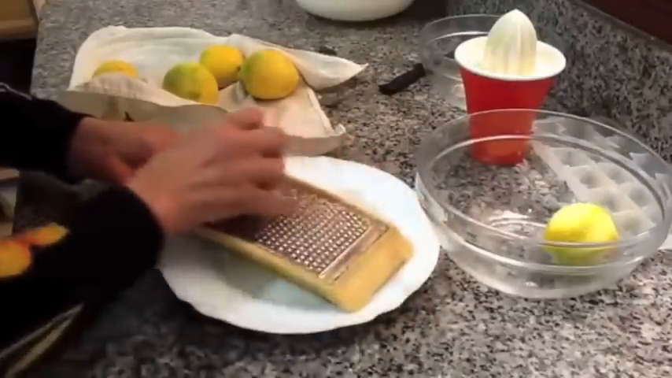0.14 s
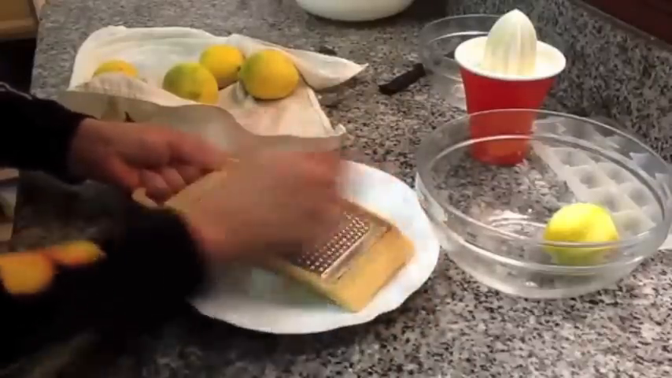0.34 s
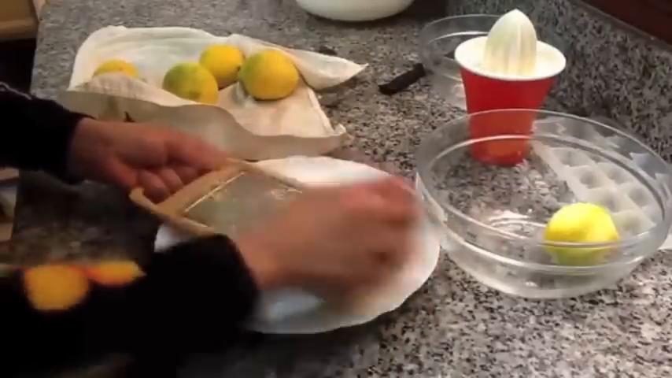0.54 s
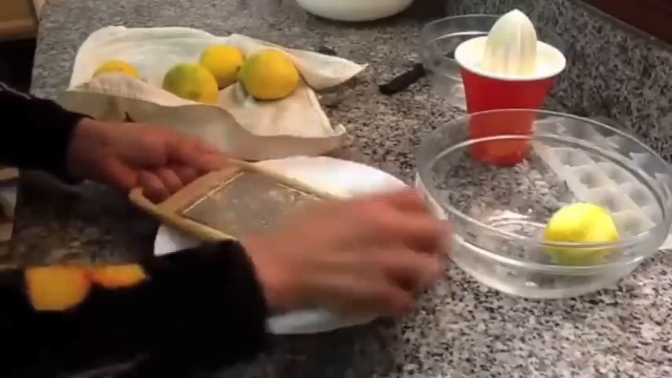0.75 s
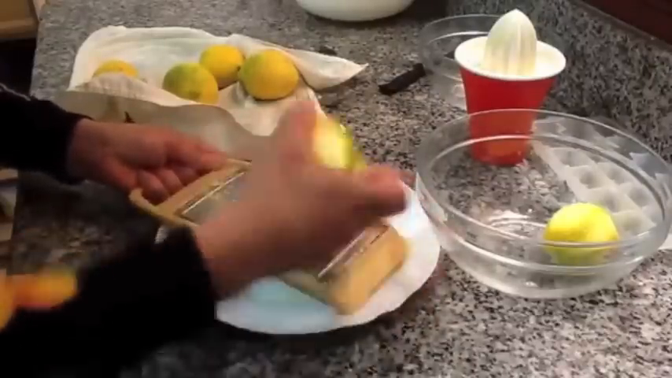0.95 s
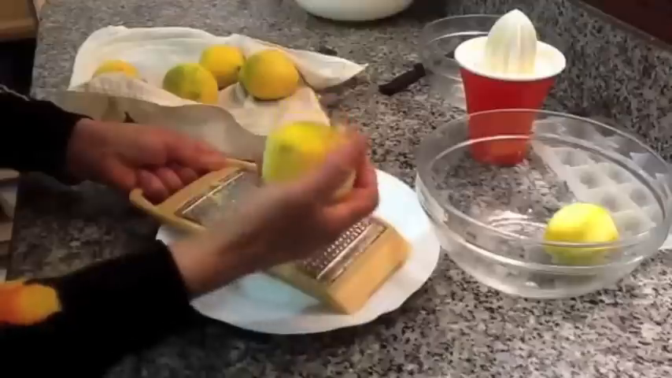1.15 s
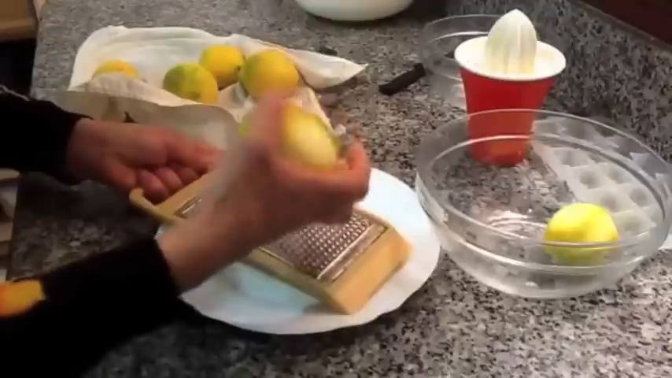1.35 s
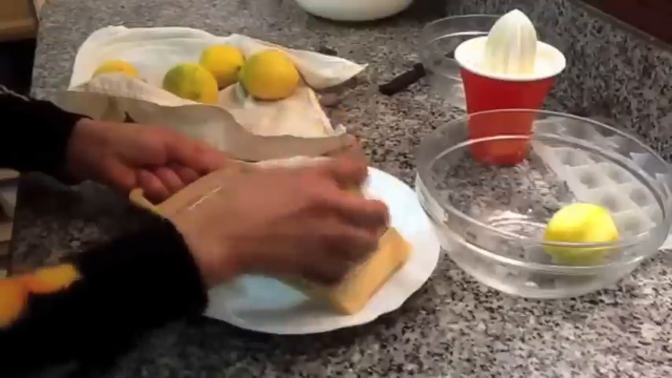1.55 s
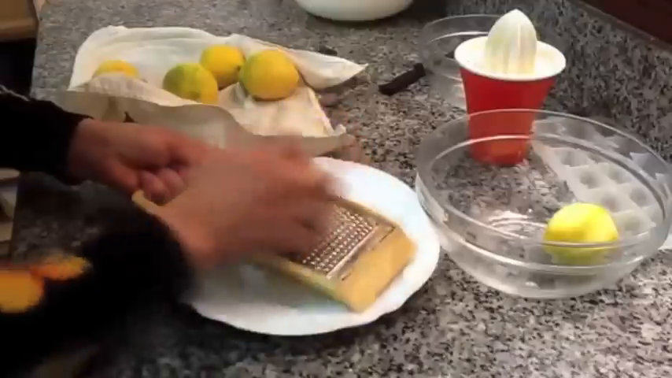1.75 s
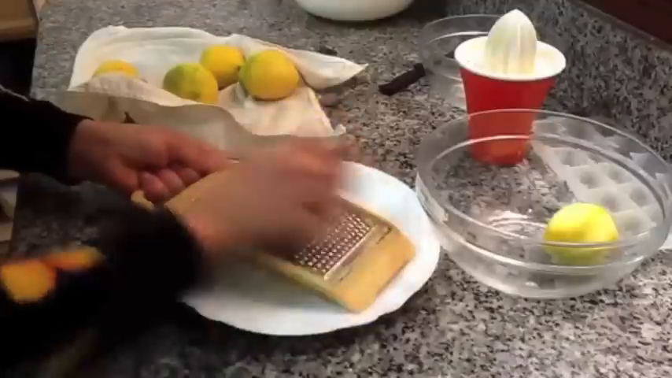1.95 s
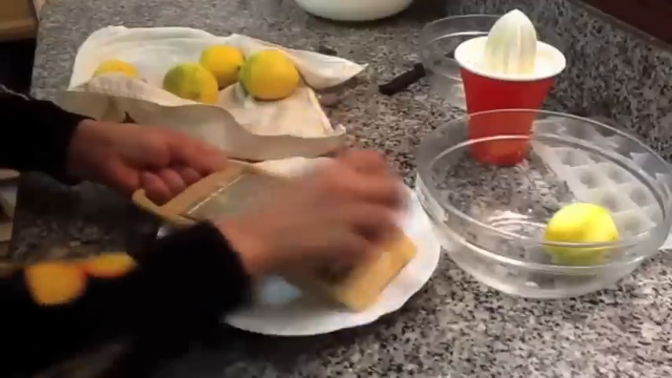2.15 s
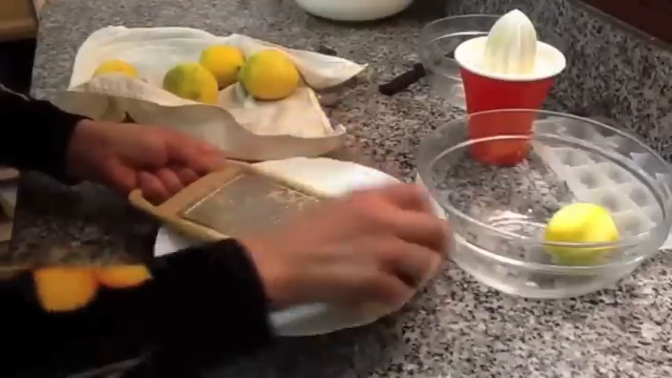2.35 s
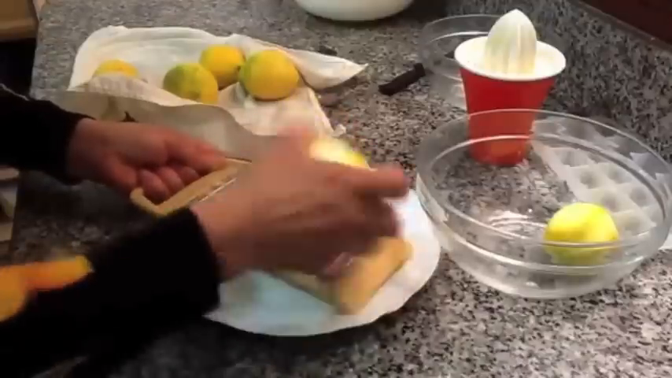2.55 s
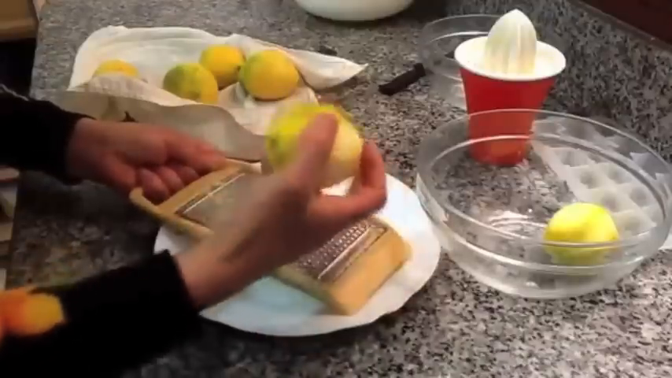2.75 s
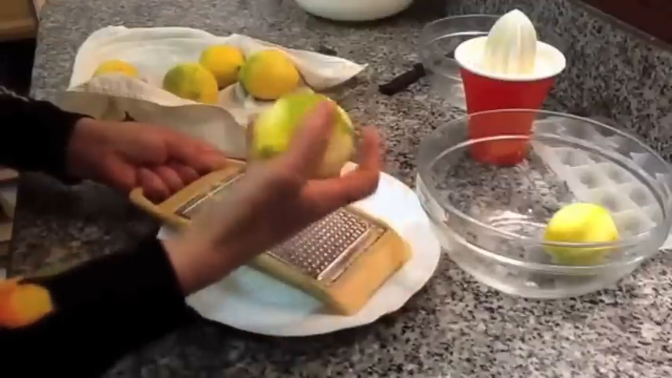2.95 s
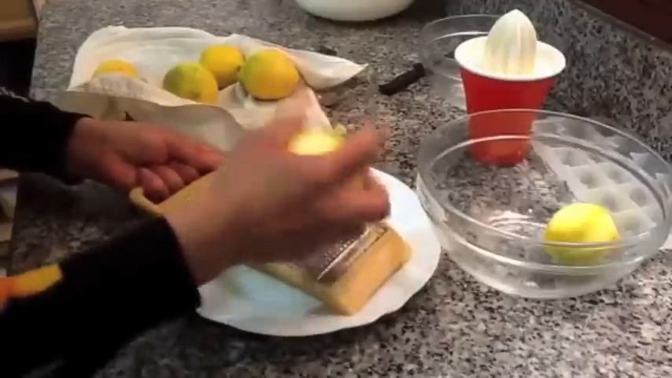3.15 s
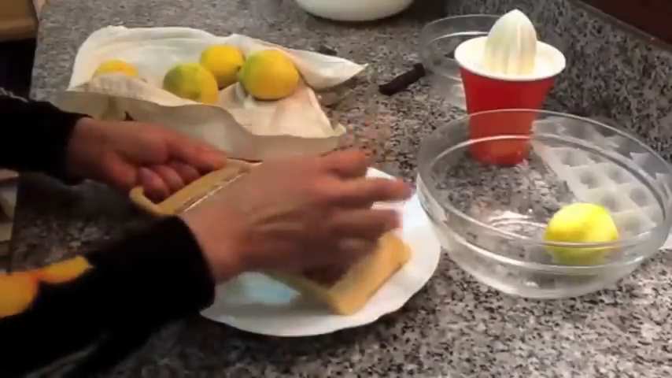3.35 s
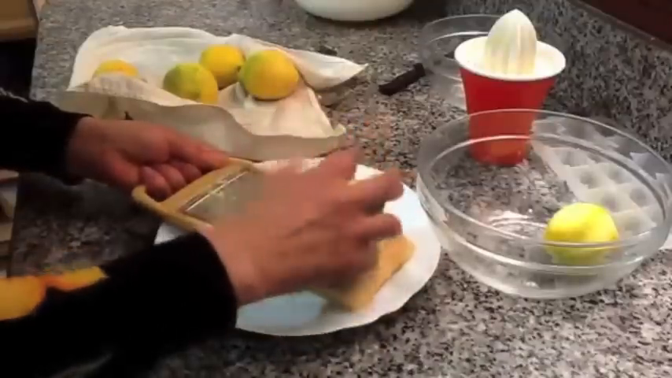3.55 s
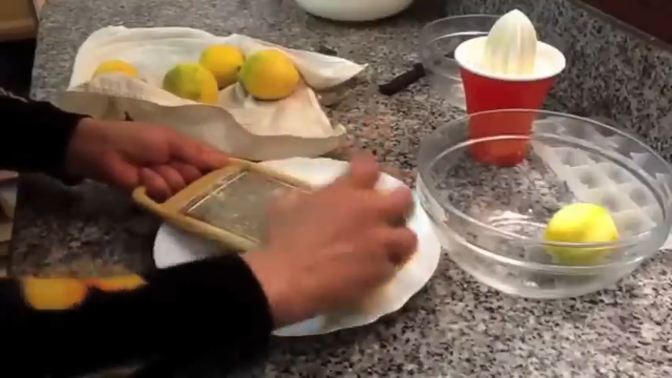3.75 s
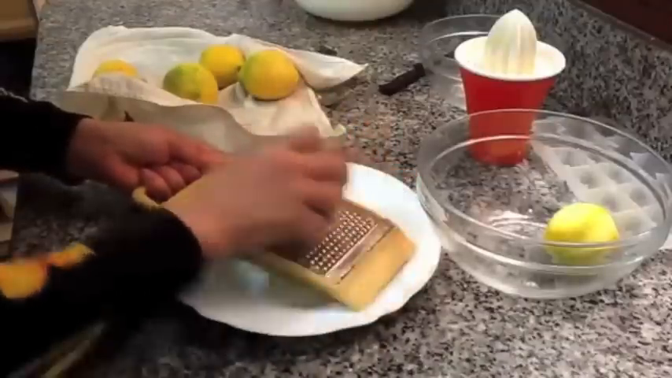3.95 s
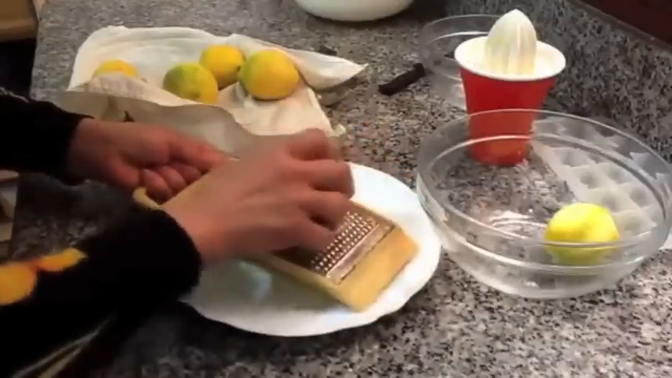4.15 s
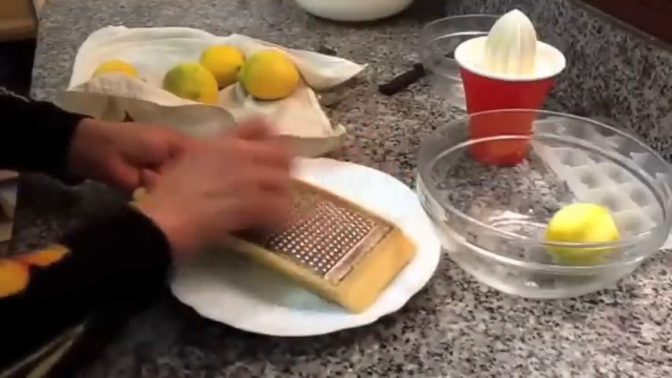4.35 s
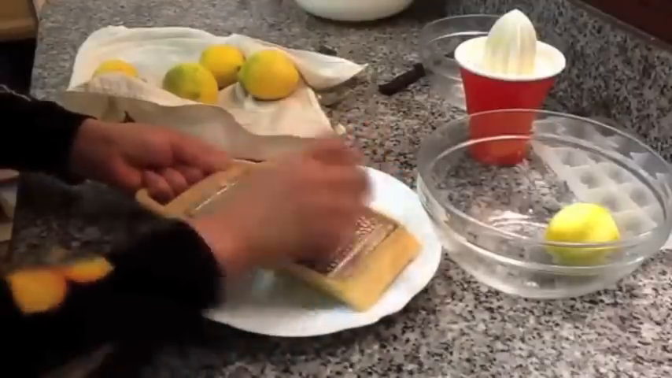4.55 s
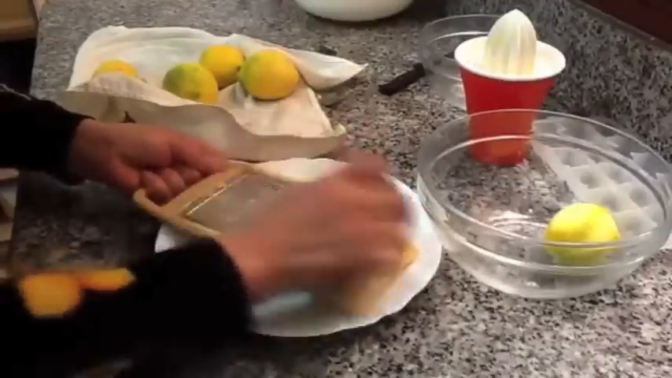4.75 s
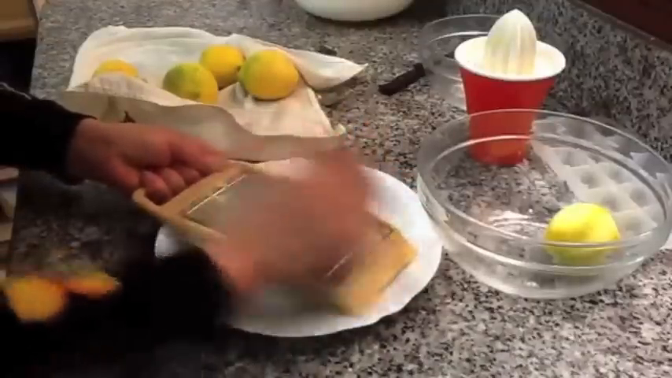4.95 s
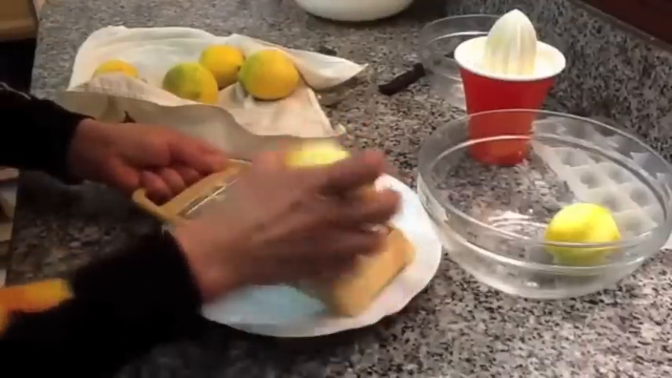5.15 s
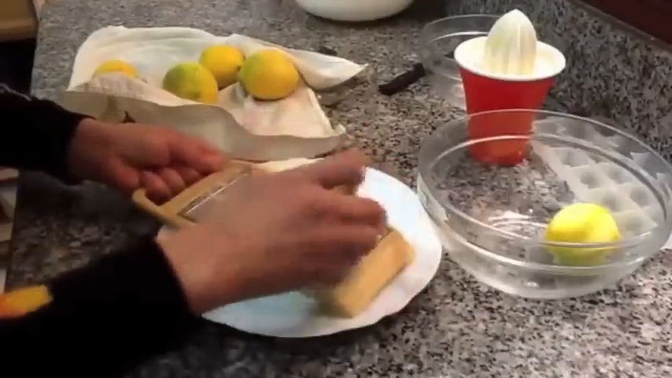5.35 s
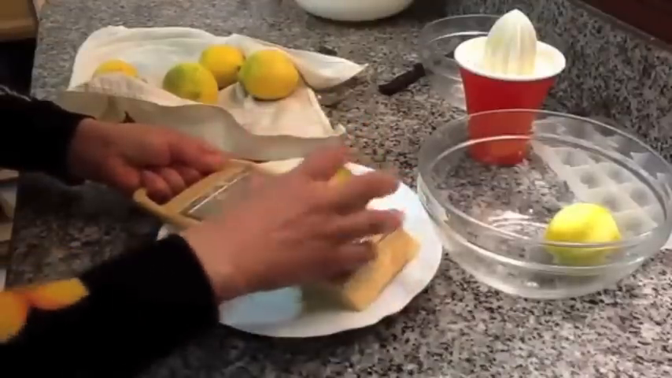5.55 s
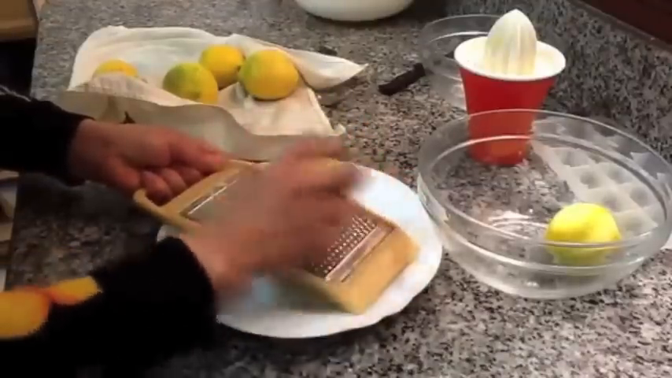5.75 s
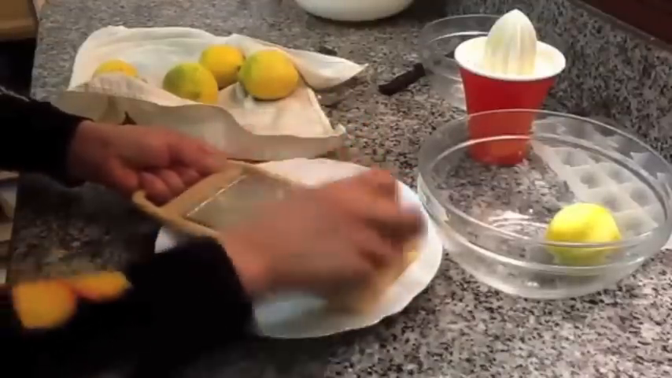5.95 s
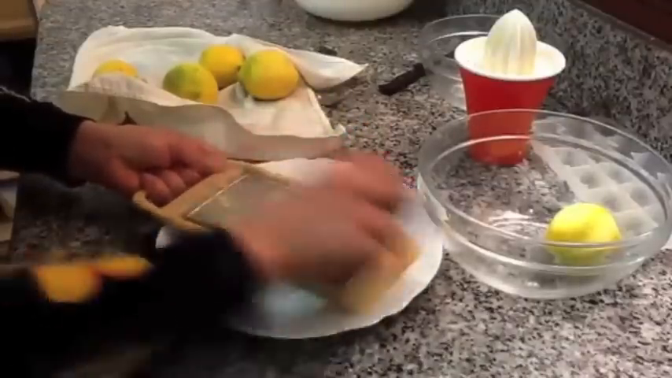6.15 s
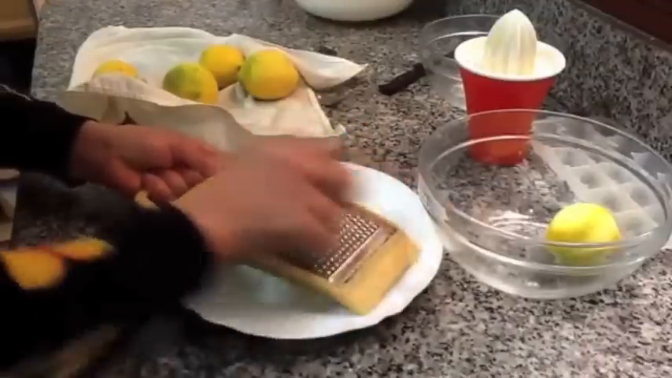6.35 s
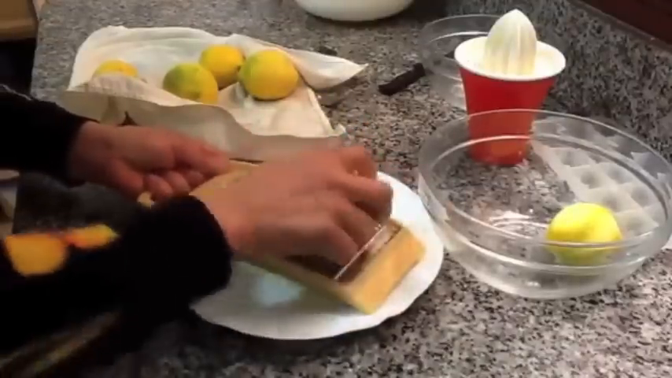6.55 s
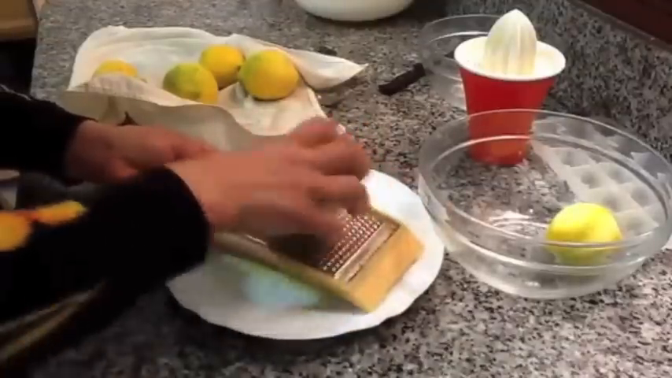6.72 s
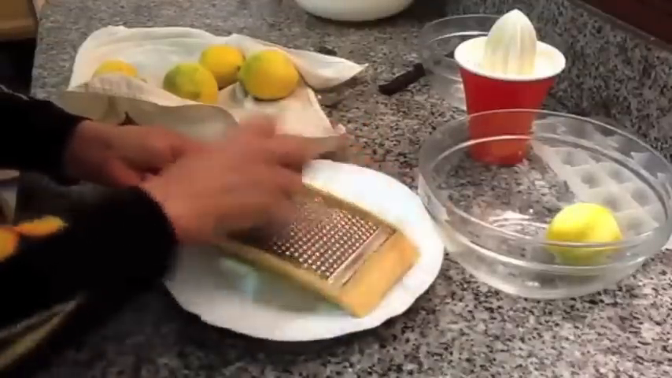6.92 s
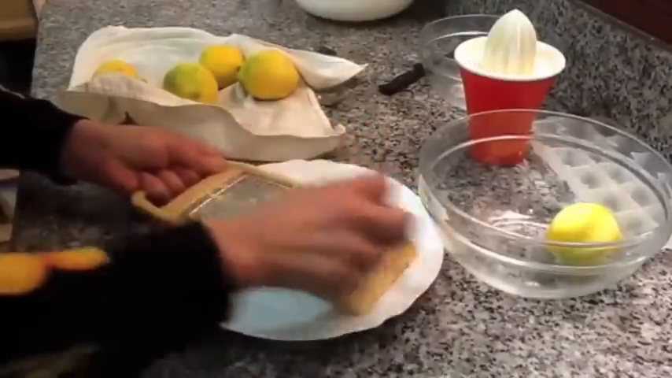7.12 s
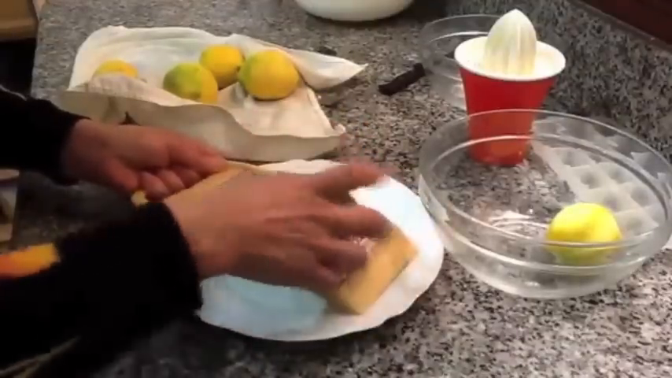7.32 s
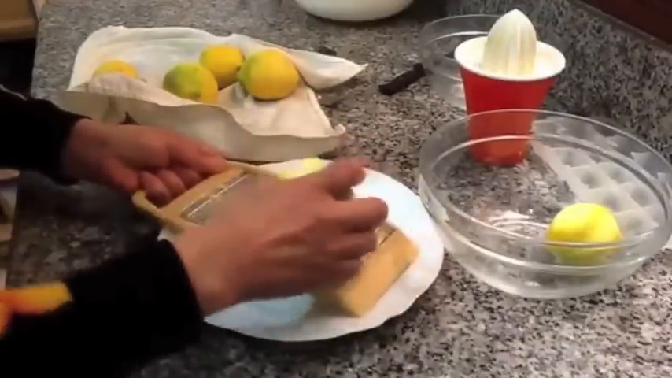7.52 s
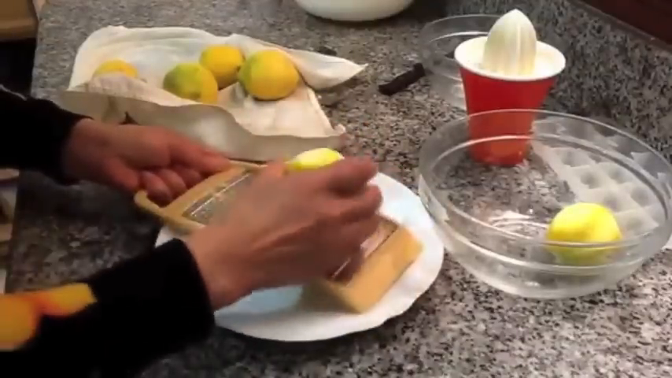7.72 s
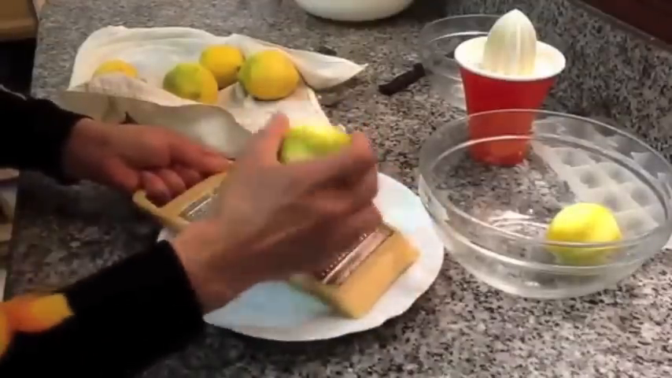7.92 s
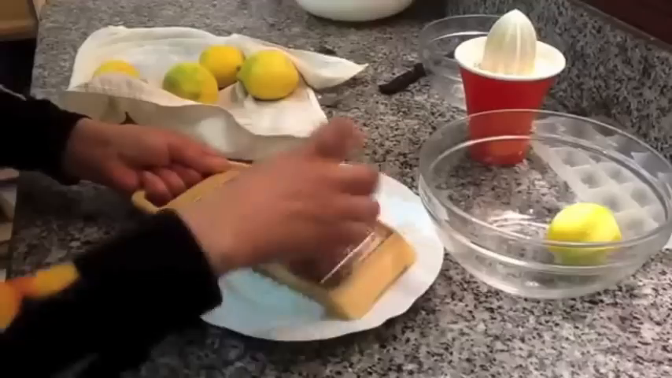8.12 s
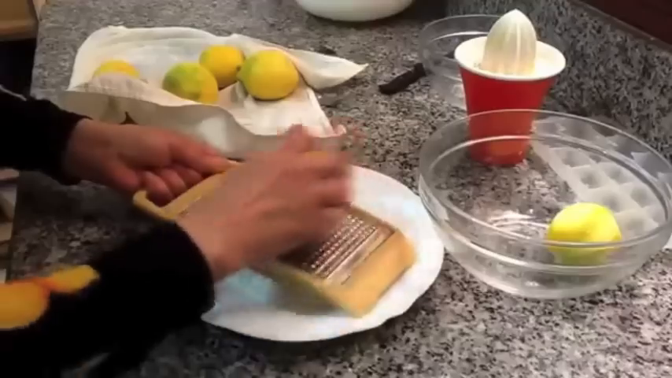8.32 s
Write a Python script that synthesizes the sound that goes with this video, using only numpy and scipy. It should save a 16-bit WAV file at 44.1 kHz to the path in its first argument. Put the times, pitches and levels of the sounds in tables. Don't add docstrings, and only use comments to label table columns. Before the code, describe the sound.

Close up in a hard tiled kitchen, a lemon is rasped over a flat steel grater in groups of fast strokes, gritty and fizzy, hard downstrokes with lighter returns. Between groups the plastic frame clacks on a china plate; the loudest clank, past five seconds, overloads the small mono microphone. Faint traffic and a distant engine lie beneath.

```python
import sys
import numpy as np
from scipy import signal
from scipy.fft import rfft, irfft, next_fast_len
from scipy.io import wavfile
from scipy.ndimage import uniform_filter1d, map_coordinates

SR = 44100
rng = np.random.default_rng(int(sys.argv[2]) if len(sys.argv) > 2 else 0)


def boost_factor(decibels):
    exponent = np.asarray(decibels, float) / 20
    return 10 ** exponent


def store_wav(level_fs):
    pcm = np.round(np.clip(np.atleast_2d(level_fs), -1, 1) * 32767)
    wavfile.write(sys.argv[1], SR, pcm.T.astype(np.int16))


N = 373968


def noise():
    return rng.standard_normal(N)


def unit(x):
    return x / np.sqrt(np.mean(np.abs(x) ** 2) + 1e-20)


def along(points, hz):
    f, v = np.transpose(points)
    return np.interp(np.log(hz + 1), np.log(f + 1), v)


def curves(rows):
    s, *cols = np.transpose(rows)
    return [np.interp(np.arange(N) / SR, s, c) for c in cols]


def wobble(rate_hz):
    knots = rng.standard_normal(int(N * rate_hz / SR) + 4)
    return map_coordinates(knots, [np.arange(N) * rate_hz / SR])


def filtered(x, response):
    m = next_fast_len(N + SR // 2)
    gain = unit(response(np.fft.rfftfreq(m, 1 / SR)))
    return irfft(rfft(x, m) * gain, m)[:N]


def colour(points):
    return lambda f: boost_factor(along(points, f))


def ring(x, peaks, shift_db, rate_hz):
    out = np.zeros(N)
    t = np.arange(N) * rate_hz / SR
    knots = int(t[-1]) + 2
    for k, (hz, width_hz, db) in enumerate(peaks):
        grip_db = shift_db * np.interp(t, np.arange(knots), rng.standard_normal(knots))
        b, a = signal.iirpeak(hz, hz / width_hz, SR)
        out += (-1) ** k * boost_factor(db) * signal.lfilter(b, a, x * boost_factor(grip_db))
    power = sum(boost_factor(2 * db) * np.pi * width_hz / SR for hz, width_hz, db in peaks)
    return out / np.sqrt(power)


# peak_s, level_db, rise_s, fall_s, frame_weight_db
DOWN_STROKES = [(0.273, -11, 0.058, 0.017, -0.5), (0.504, -10, 0.044, 0.039, 1.5),
                (0.739, -8.5, 0.034, 0.032, 1), (1.795, -14, 0.038, 0.1, -2.5),
                (2.084, -8.5, 0.031, 0.051, -2), (2.36, -8, 0.05, 0.013, -1),
                (4.497, -12, 0.052, 0.028, 1.5), (4.737, -10.5, 0.028, 0.059, -0.5),
                (4.996, -10.5, 0.044, 0.031, -0.5), (5.95, -13, 0.046, 0.019, -3.5),
                (6.169, -11.5, 0.037, 0.041, 0), (6.409, -15.5, 0.033, 0.019, -1),
                (7.048, -10, 0.041, 0.023, 3.5), (8.49, -15.5, 0.029, 0.03, 0)]
# peak_s, level_db, rise_s, fall_s, frame_weight_db
BACK_STROKES = [(0.0, -41.5, 0.012, 0.068, -1), (0.39, -18.5, 0.04, 0.037, -0.8),
                (0.628, -14.5, 0.034, 0.041, -1.7), (1.993, -17, 0.036, 0.015, -1.5),
                (2.235, -18, 0.063, 0.029, 0), (4.891, -22, 0.0306, 0.0251, 2), (5.11, -33, .03, 0.022, 9),
                (6.049, -19, 0.032, 0.049, 0.7), (6.281, -19.5, 0.042, 0.088, -0.5),
                (6.5, -41, 0.04, 0.08, -8), (6.927, -29, 0.029, 0.035, 2), (7.16, -27.5, 0.044, 0.032, -10),
                (8.383, -30, 0.035, 0.028, 1)]
# peak_s, level_db, rise_s, fall_s, frame_weight_db
RUBS = [
    (1.677, -28, 0.016, 0.055, -1.5),
    (1.843, -24, 0.02, 0.04, -3.5),
    (3.945, -37, 0.046, 0.032, -0.5),
    (4.362, -39, 0.034, 0.026, -1),
    (4.654, -32, 0.046, 0.036, -1.2),
    (5.844, -38, 0.06, .015, 2),
]
# peak_s, level_db
BITES = [
    (0.132, -40.5),
    (0.221, -24.5),
    (2.059, -28.5),
    (2.311, -20.5),
    (4.445, -36),
    (5.9, -38.5),
    (6.33, -30),
    (7.004, -21),
]


def hand():
    t = np.arange(N) / SR
    force = np.zeros((3, N))
    bites = [(s, db, 0.015, 0.011, 0) for s, db in BITES]
    # moves, fizz_db, boom_db (re the rasp)
    kinds = [(DOWN_STROKES, -1.46, -7.5), (BACK_STROKES, -5.5, -4.5), (RUBS, -6, 4.6), (bites, 0.5, -12.5)]
    for moves, fizz_db, boom_db in kinds:
        for peak_s, level_db, rise_s, fall_s, weight_db in moves:
            near = slice(max(round((peak_s - .2) * SR), 0), round((peak_s + .2) * SR))
            phase = (t[near] - peak_s) / np.where(t[near] < peak_s, rise_s, fall_s)
            swell_db = level_db - 10.24 * np.abs(phase) ** 2.62
            force[:, near] += boost_factor(swell_db + np.array([[0], [fizz_db], [boom_db + weight_db]]))
    return force


def catches(per_second, spread_db, smooth):
    bites = rng.random(N) < per_second / SR
    size = boost_factor(spread_db * rng.exponential(size=N)) * rng.choice([-1, 1], N)
    return unit(unit(bites * size) + smooth * noise())


# pitch_hz, width_hz, level_db
SHEET_PEAKS = [(1225, 90, 1), (1470, 67, -18), (1620, 53, 1), (1747, 170, -5.5), (2047, 180, 0),
               (2290, 127, 3.5), (2350, 120, 0.5), (2783, 50, 0)]
# pitch_hz, level_db
BODY = [(300, -29), (600, -20), (1200, -2.5), (1600, 3), (2300, -3), (3000, -5), (4500, -28.5)]
# pitch_hz, width_hz, level_db
FRAME_PEAKS = [(164, 21, -11.5), (289, 87, -18), (458, 83, -11), (547, 69, -6.5), (695, 87, -1.5),
               (815, 59, -0.5), (1030, 120, -12)]
# pitch_hz, width_hz, level_db
CHINA_PEAKS = [(3620, 560, -0.5), (4392, 130, 14.5), (5220, 260, 6.5), (6320, 130, 14), (6970, 370, -33),
               (7280, 120, 7.5), (8600, 160, -22), (9570, 45, 4)]
# pitch_hz, level_db
TEARING = [(1500, -39), (3000, -2), (4500, -1), (7000, 1.5), (10000, -2), (14000, -4), (16000, -6)]


def rasping(force):
    force = force * boost_factor(0.92 * wobble(60) + 1.0 * wobble(200))
    biting = force[0] * catches(2300, spread_db=3, smooth=0.74)
    sheet = ring(biting, SHEET_PEAKS, shift_db=2.5, rate_hz=40)
    body = filtered(force[0] * catches(2200, spread_db=3, smooth=0.76), colour(BODY))
    rasp = boost_factor(-2.5) * sheet + boost_factor(-2.5) * body
    tearing = force[1] * catches(6000, spread_db=0.54, smooth=0.9)
    singing = ring(tearing, CHINA_PEAKS, shift_db=2.5, rate_hz=40)
    fizz = filtered(tearing, colour(TEARING))
    boom = ring(force[2] * noise(), FRAME_PEAKS, shift_db=2.5, rate_hz=22)
    return boost_factor(-2.5) * rasp + boost_factor(-3.5) * fizz + boost_factor(-2.5) * boom, boost_factor(-7.0) * singing


# start_s, level_db, boom_re_level_db, china_re_level_db
KNOCKS = [(0.1421, -12.5, -9.5, -9.5), (0.215, -24, 4, 2), (0.3705, -8.5, -20, -16),
          (0.8025, -2, -10, -8.5), (1.6015, -4.5, -13, -11), (1.675, -19, -4, -12), (1.742, -34.5, -5, 5),
          (1.958, -11.5, -24, -11.5), (3.305, -17.5, -14, -10), (3.746, -32, -9, -19),
          (3.925, -28, -12, -14), (3.982, -31.5, -2, -8.5), (4.069, -33.5, 3, -20), (4.6514, -23, 0, -8.5),
          (5.4041, 6.5, -10, -3.5), (5.809, -24.5, -21, -13.5), (6.277, -15.5, -13, -4.5),
          (6.6184, -32.5, -14, -9), (6.896, -32, 1, -14), (7.221, -20.5, -21, -22),
          (7.608, -28, -14, -15.5), (8.063, -20.5, -6.5, -15), (8.186, -42, -11, -20),
          (8.341, -31, -8, -15)]
# pitch_hz, level_db
THUD = [(150, -44), (300, -16), (600, -5), (1200, 2.5), (2200, 0), (3200, -8.5), (6000, -12),
        (15000, -45.5)]


def knocks():
    lead_s, rattle_t60_s = 0.006, 0.029
    t = np.arange(SR // 10) / SR
    blows, clicks = np.zeros((3, N + SR)), np.zeros((2, N))
    graze = boost_factor(-28.5 - 3500 * (lead_s - t))
    decay = boost_factor(-60 * (t - lead_s) / rattle_t60_s)
    shape = np.where(t < lead_s, graze, decay)
    for start_s, level_db, boom_db, china_db in KNOCKS:
        rattle = shape * rng.standard_normal((3, len(t)))
        i = round((start_s - lead_s) * SR)
        blows[:, i:i + len(t)] += boost_factor(level_db + np.array([[0], [china_db], [boom_db]])) * rattle
        clicks[:, round(start_s * SR)] = boost_factor([level_db, level_db + china_db]) * np.linalg.norm(shape)
    sheet, plate, frame = blows[:, :N]
    dull = boost_factor(-3.5) * filtered(sheet, colour(BODY))
    dull += boost_factor(1) * ring(frame, FRAME_PEAKS, shift_db=2.0, rate_hz=8)
    dull += boost_factor(-8.5) * ring(sheet, SHEET_PEAKS, shift_db=2.5, rate_hz=8)
    bright = boost_factor(-4) * filtered(plate, colour(TEARING))
    bright += boost_factor(5) * ring(plate, CHINA_PEAKS, shift_db=1.5, rate_hz=8)
    blow = filtered(clicks[0], colour(THUD)) + boost_factor(-3.5) * filtered(clicks[1], colour(TEARING))
    return dull + bright, blow


# start_s, level_db
PLATE_MODES = [(60, -18, .03), (300, -11, .03), (1270, -7, .08), (1570, -0.5, .055), (4230, -8, .05),
               (5180, -6, .03), (6290, -7, .3), (6900, -17, .15), (7530, -12, .18), (8420, -16, .15),
               (9710, -23, .15)]
PLATE_BLOWS = [
    (0.804, -24),
    (5.403, -6.5),
    (5.839, -54),
]
EDGE_MODES = [(2250, -2, 0.041), (2810, -5, 0.027), (70, -33, .03), (270, -18.5, .03)]
EDGE_BLOWS = [
    (1.602, -8),
    (7.61, -45),
    (8.064, -31),
]
SEAT_MODES = [(222, -4, 0.062), (586, -6, 0.13), (695, -2, 0.11), (1440, 1.5, .05), (2040, -11, 0.32),
              (2220, -19, .1)]
SEAT_BLOWS = [
    (3.306, -25.5),
]
FRUIT_MODES = [(1250, 1, 0.039), (735, -5, .055), (1625, -3.5, 0.047)]
FRUIT_BLOWS = [
    (3.747, -33),
    (3.944, -30),
    (3.982, -37),
    (4.069, -33),
]


def pings():
    blur_hz, uneven_db, attack_s = 14, 2, 0.00063
    out, t = np.zeros(N + SR), np.arange(SR // 3) / SR
    struck = [(PLATE_MODES, PLATE_BLOWS), (EDGE_MODES, EDGE_BLOWS),
              (SEAT_MODES, SEAT_BLOWS), (FRUIT_MODES, FRUIT_BLOWS)]
    for modes, blows in struck:
        hz, mode_db, t60_s = np.transpose(modes)[:, :, None]
        for start_s, blow_db in blows:
            steps = rng.standard_normal((len(modes), len(t)))
            drift = np.cumsum(steps, axis=1) * np.sqrt(2 * np.pi * blur_hz / SR)
            uneven = uneven_db * rng.uniform(-1.1, 1, hz.shape)
            size = boost_factor(blow_db + mode_db + uneven - 60 * t / t60_s)
            tones = np.sum(size * np.sin(2 * np.pi * hz * t + drift), axis=0)
            out[round(start_s * SR):][:len(t)] += (1 - np.exp(-t / attack_s)) * tones
    return out[:N] * boost_factor(4.3 * wobble(120))


# pitch_hz, t60_s
KITCHEN_T60 = [(150, 0.91), (600, 1), (1500, 0.9), (3500, 0.84), (7000, 0.52), (14000, 0.36)]


def kitchen(x, count):
    hz, t, z = signal.stft(rng.standard_normal((count, SR * 3 // 4)), SR, nperseg=256)
    decay = boost_factor(-60 * t / along(KITCHEN_T60, hz)[:, None])
    tails = signal.istft(z * decay, SR, nperseg=256)[1]
    t = np.arange(tails.shape[1]) / SR
    onset = np.clip((t - .006) / 0.0074, 0, 1)
    tails = tails * onset * (1 + 2.0 * np.exp(-t / 0.078))
    turn = np.pi * (np.arange(N) / SR / .45 + np.arange(count)[:, None] / count)
    share = np.cos(turn) * np.sqrt(2 / count)
    wet = signal.fftconvolve(x * share, tails / np.linalg.norm(tails[0]), axes=1)
    return wet[:, :N].sum(axis=0)


# pitch_hz, density_db_per_hz
DRONE = [(100, -28), (150, -6), (180, -0.5), (230, -1.5), (330, -7), (600, -56)]


def stroke_drone(force):
    lag_s = 0.37
    push = uniform_filter1d(force[0], round(lag_s * SR))
    return boost_factor(-34.5) * unit(push) * 0.091 * filtered(noise(), colour(DRONE))


# time_s, firing_hz, level_db
ENGINE = [
    (2.2, 43.4, -87),
    (3.1, 51, -91),
    (4.0, 59.8, -77),
    (4.3, 61.1, -69),
    (5.3, 80.4, -70),
    (5.9, 88.1, -66),
    (6.5, 90, -54),
    (6.9, 72.2, -67),
    (7.3, 62.7, -80),
]


def engine():
    hz, db = curves(ENGINE)
    turn = 2 * np.pi * np.cumsum(hz) / SR
    t = np.arange(N) / SR
    passing = np.clip((t - ENGINE[0][0]) / .3, 0, 1) * np.clip((ENGINE[-1][0] - t) / 0.33, 0, 1)
    orders = np.sin(turn)
    orders += boost_factor(2 + 3 * wobble(4)) * np.sin(2 * turn)
    orders += boost_factor(-4 + 3 * wobble(4)) * np.sin(3 * turn)
    return passing * boost_factor(db + 1.2 * wobble(10)) * np.sqrt(2) * orders


# peak_s, level_db
THROBS = [
    (2.6, -74),
    (3.1, -68),
    (6.02, -48),
    (6.42, -43),
    (6.75, -59),
    (7.62, -64.5),
    (8.45, -65),
]


def room_mode():
    mode_hz, half_length_s = 90, 0.079
    t = np.arange(N) / SR
    throb = sum(boost_factor(db - 7.3 * ((t - s) / half_length_s) ** 2) for s, db in THROBS)
    hum = boost_factor(-76.5) * ring(noise(), [(mode_hz, 6, 0)], shift_db=0.0, rate_hz=3.1)
    return hum + np.sqrt(2) * throb * np.sin(2 * np.pi * mode_hz * t + .5 * wobble(5.25))


# time_s, level_db
TRAFFIC = [
    (0, -50.5),
    (1.5, -57),
    (2.6, -55.5),
    (3.6, -56),
    (5.6, -49.5),
    (6.2, -48),
    (7.2, -48.5),
    (8.48, -51),
]
# pitch_hz, density_db_per_hz
RUMBLE = [(30, -19), (120, -14.5), (260, 0), (530, 5), (900, -1), (2300, -7.5), (5000, -49), (11000, -73)]


def traffic():
    level_db, = curves(TRAFFIC)
    drone = boost_factor(level_db - 7) * filtered(noise(), colour(DRONE))
    return drone + boost_factor(level_db + 1.5 * wobble(3.2)) * filtered(noise(), colour(RUMBLE))


def scene():
    knock, blow = knocks()
    force = hand()
    rasp, singing = rasping(force)
    grater = rasp + pings()
    room = kitchen(grater + blow + boost_factor(-2.0) * singing, count=2)
    indoors = grater + singing + knock + boost_factor(-6.5) * room
    mic_bass_hz = 146
    thin = signal.butter(4, mic_bass_hz, "high", fs=SR, output="sos")
    near = signal.sosfilt(thin, indoors + stroke_drone(force))
    return (near + engine() + room_mode() + traffic())[None]


def top_cut(x):
    return signal.sosfilt(signal.butter(12, 16250, fs=SR, output="sos"), x)


# pitch_hz, density_db_per_hz
HISS = [(240, -59), (400, -2.5), (512, -14), (2930, -2), (4700, -2.5), (13900, -3.5), (15300, -4.5),
        (16000, -56)]


def record(dry):
    duck_db, recover_s, overload, top_hz = 2.5, 0.77, 1.5, 15000
    x = dry[0] + boost_factor(-54) * filtered(noise(), colour(HISS))
    excess = np.clip(np.abs(x) - overload, 0, None)
    memory = signal.lfilter([1], [1, -np.exp(-1 / (recover_s * SR))], excess)
    x = x * boost_factor(-duck_db * memory / (memory.max() + 1e-9))
    x = x / (1 + np.abs(x / 0.98) ** 10) ** (1 / 10)

    def band_limit(f):
        return boost_factor(-np.clip((f - top_hz) / 2, 0, 30) - np.clip((f - top_hz) / 15, 0, 90))

    x = filtered(x, band_limit) * np.sqrt(2 * top_hz / SR)
    return top_cut(x[None])


dry = scene()
out = record(dry)
store_wav(out)
```